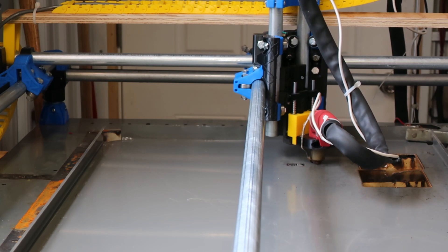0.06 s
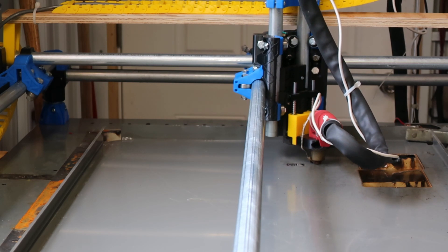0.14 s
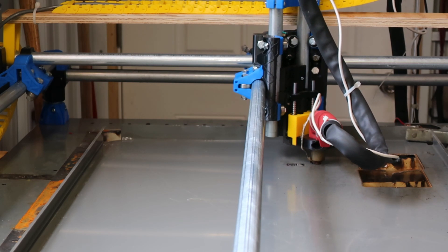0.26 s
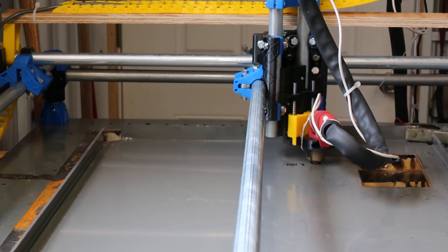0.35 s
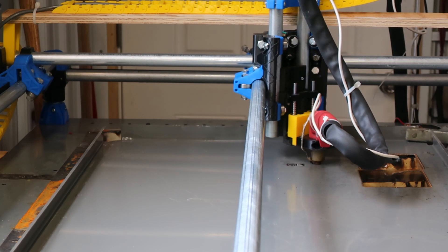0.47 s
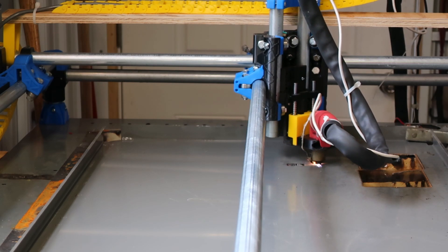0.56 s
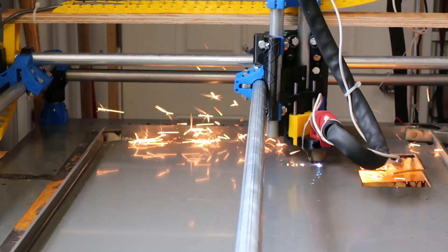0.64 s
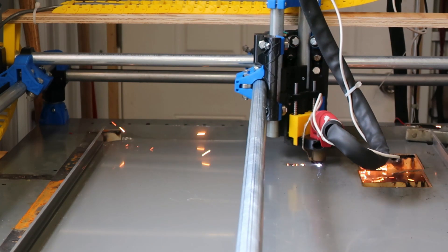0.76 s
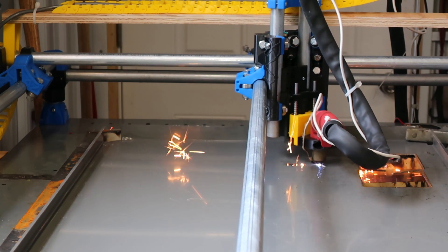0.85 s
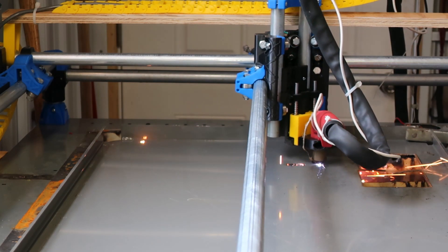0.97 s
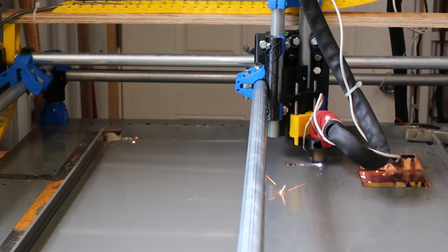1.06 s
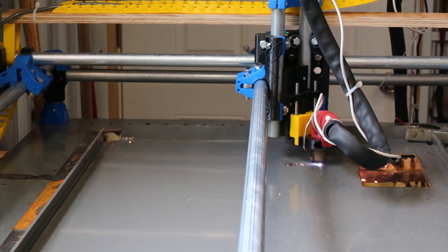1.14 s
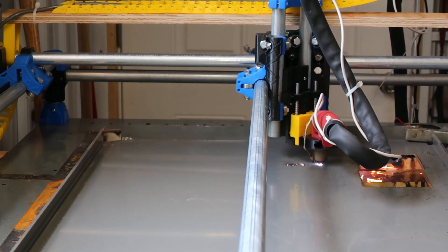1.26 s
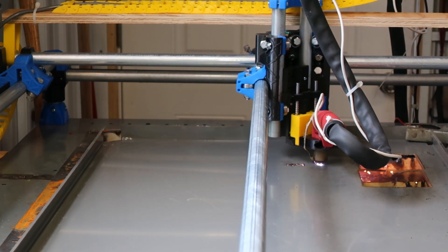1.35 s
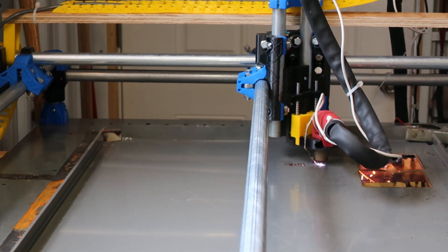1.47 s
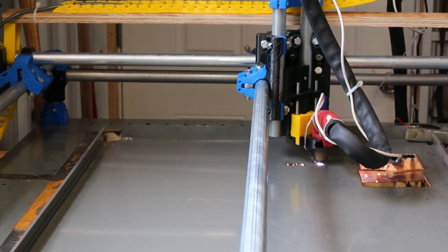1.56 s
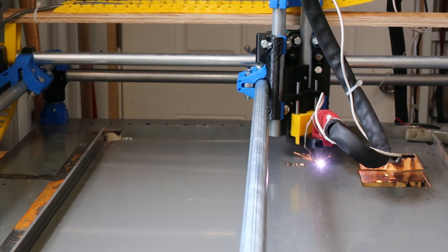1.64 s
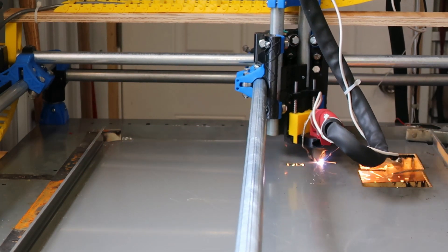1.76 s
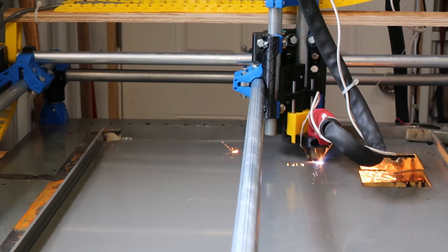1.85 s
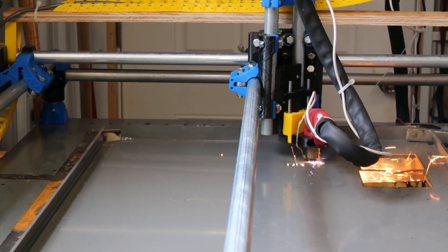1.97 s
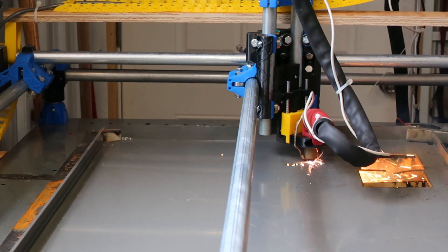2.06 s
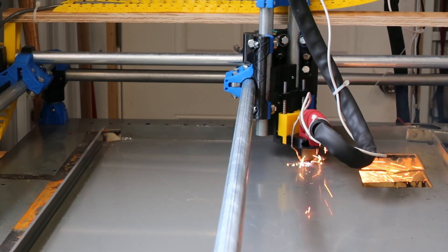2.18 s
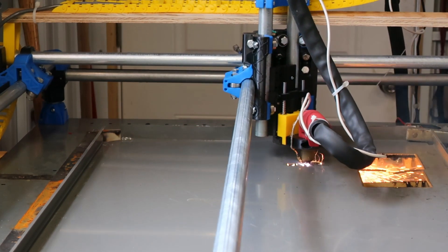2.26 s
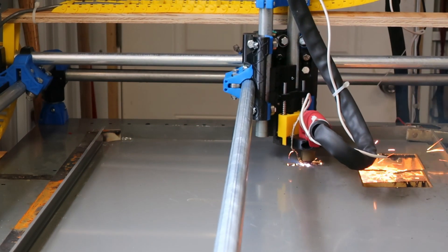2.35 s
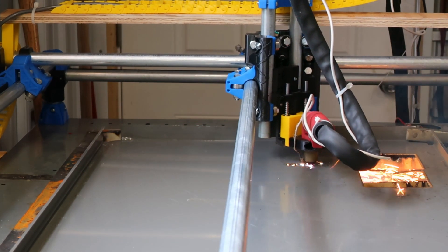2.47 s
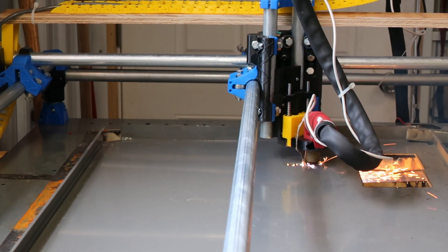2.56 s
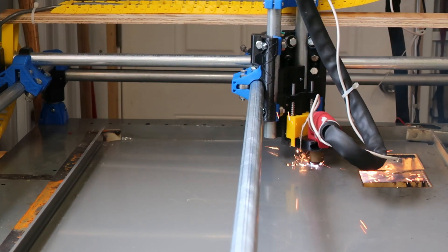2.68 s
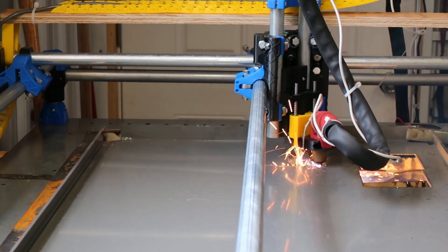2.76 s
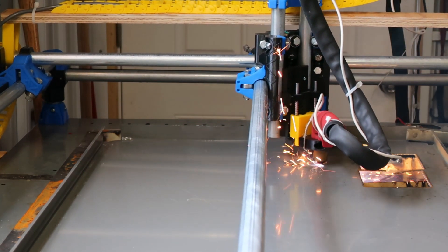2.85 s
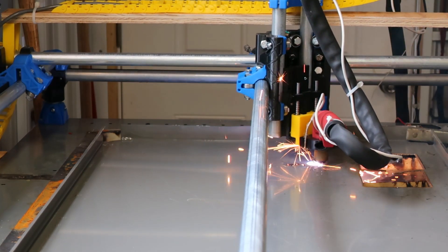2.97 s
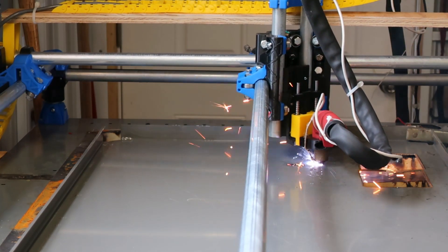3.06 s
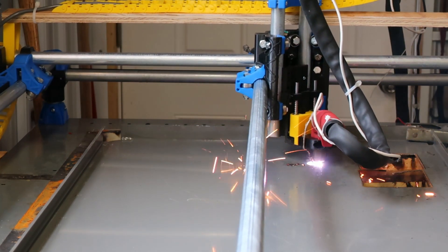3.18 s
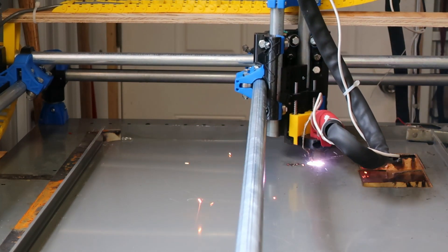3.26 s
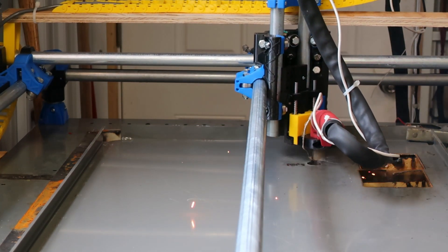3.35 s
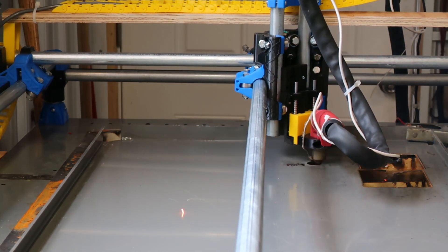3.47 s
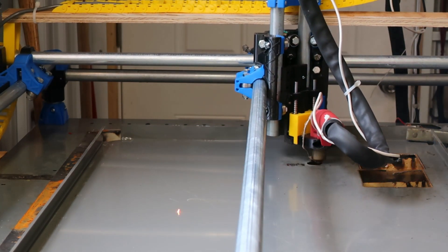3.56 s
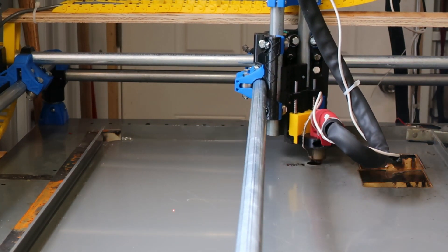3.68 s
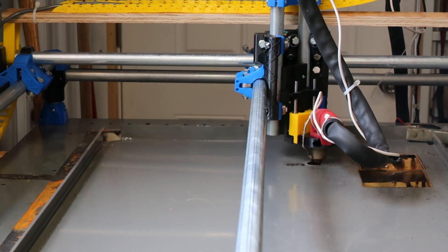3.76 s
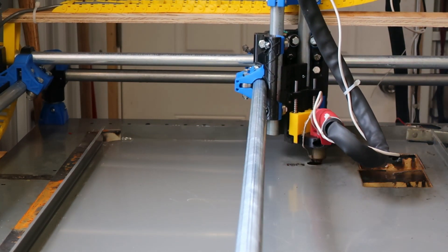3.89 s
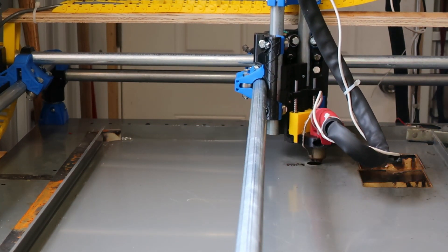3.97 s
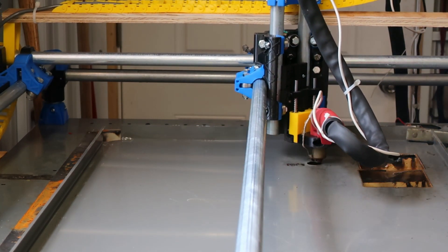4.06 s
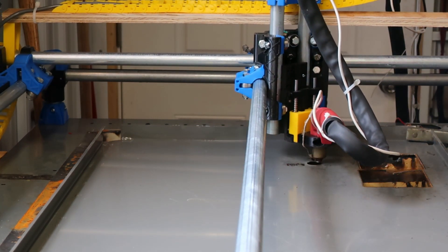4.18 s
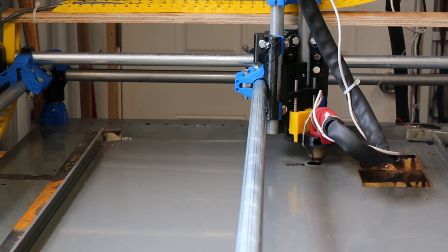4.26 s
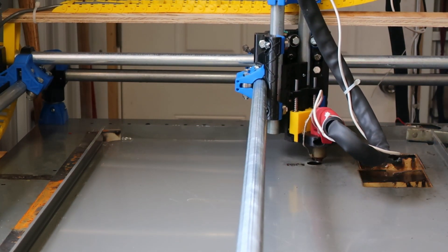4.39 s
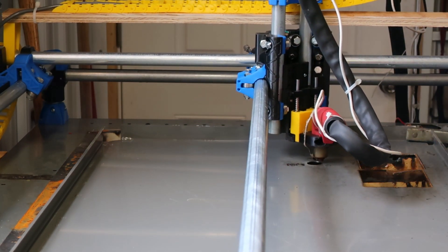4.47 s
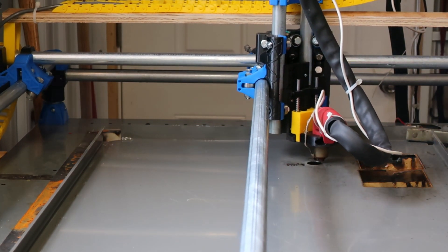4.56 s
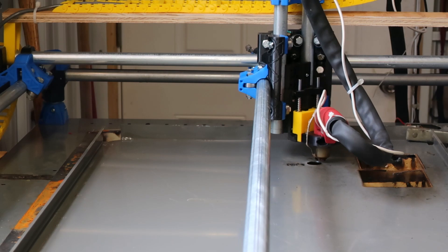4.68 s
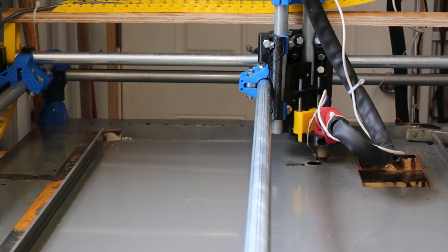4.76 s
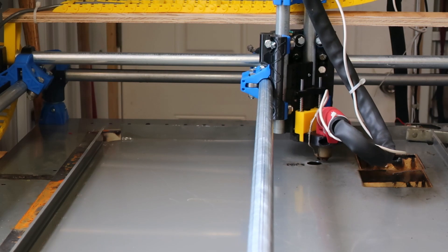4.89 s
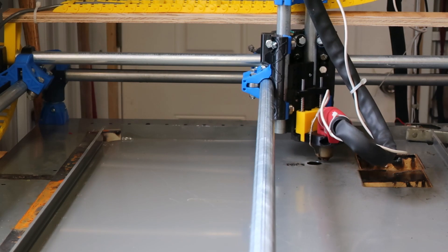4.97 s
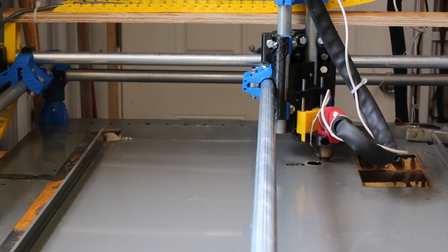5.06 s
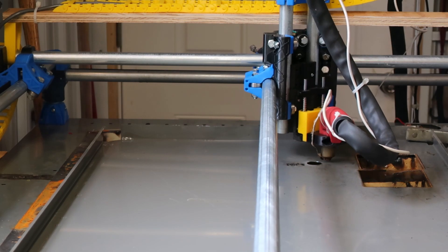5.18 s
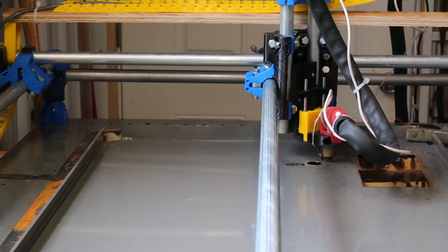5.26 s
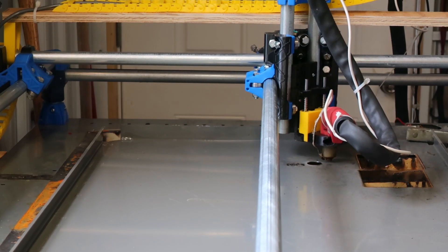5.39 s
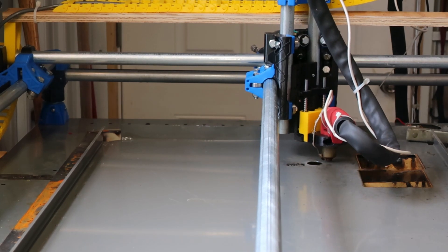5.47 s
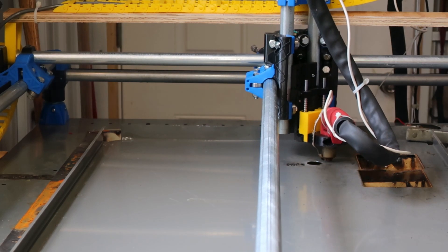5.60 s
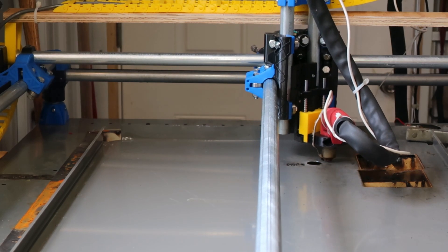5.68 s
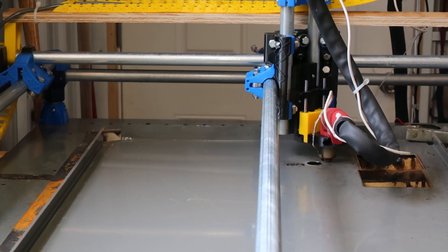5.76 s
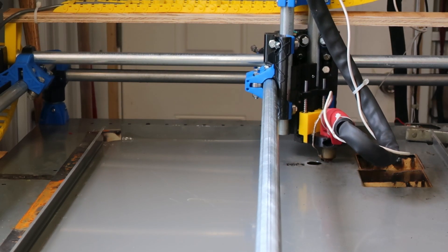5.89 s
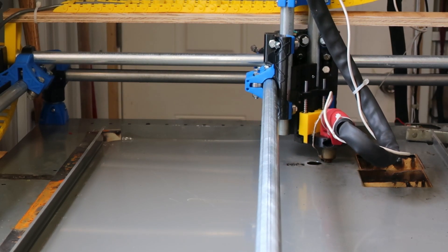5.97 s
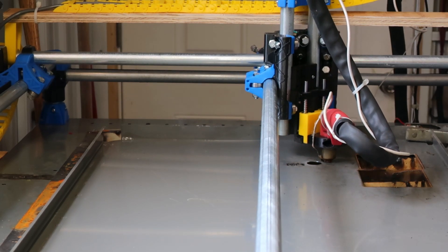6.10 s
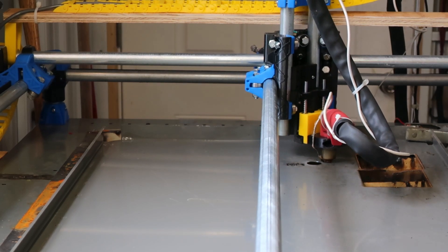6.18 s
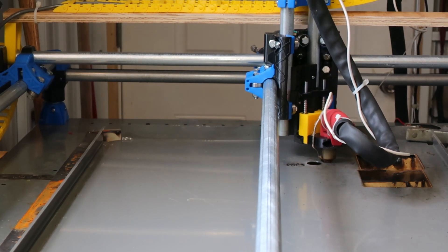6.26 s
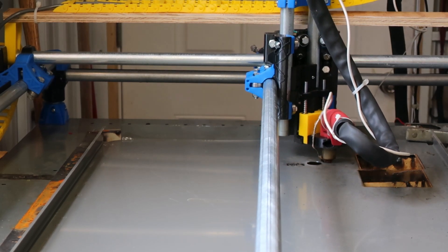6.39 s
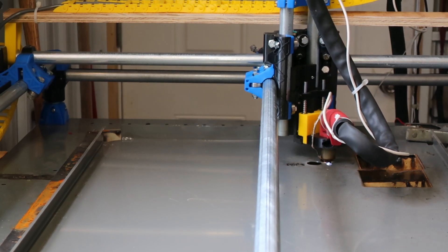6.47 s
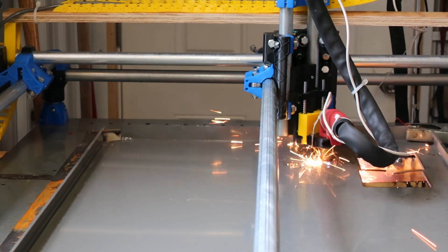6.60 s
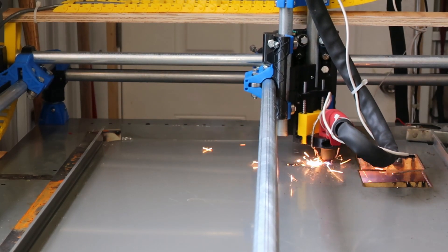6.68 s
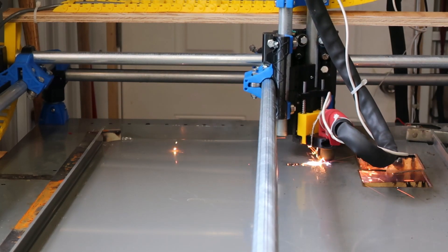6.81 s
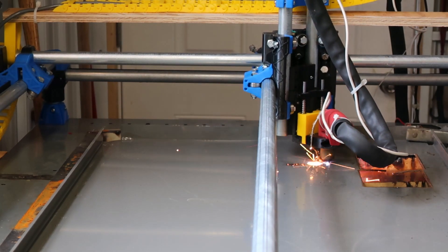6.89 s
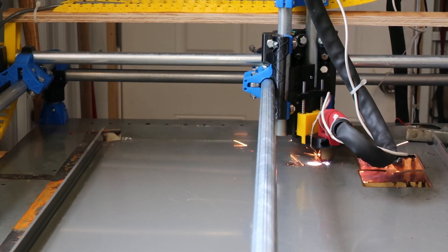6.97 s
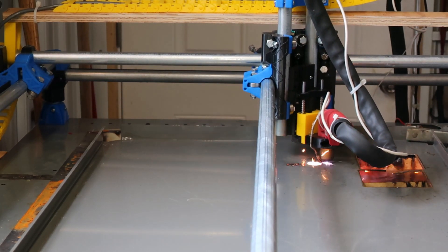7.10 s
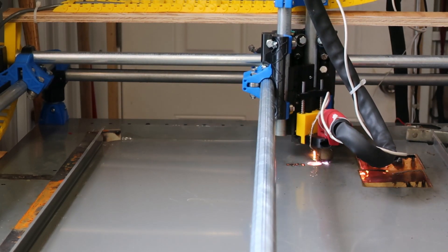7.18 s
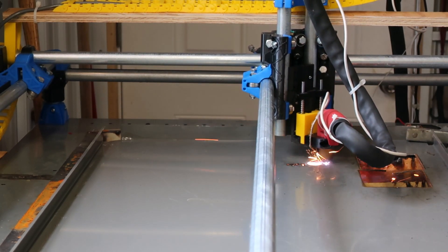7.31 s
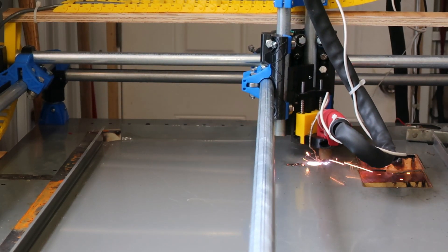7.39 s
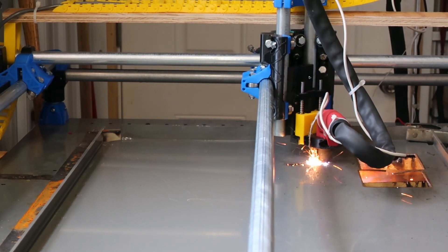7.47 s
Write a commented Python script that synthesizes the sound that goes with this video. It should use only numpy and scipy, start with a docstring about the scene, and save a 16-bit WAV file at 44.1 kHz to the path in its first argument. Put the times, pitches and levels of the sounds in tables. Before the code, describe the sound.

A torch over thin sheet steel in a small, moderately echoing workshop, close stereo microphone. From 0 to 0.65 s a smooth, bright cold air jet hisses with thin wavering whistles. At 0.65 s several sharp cracks and a brief rough mid-pitched note mark the strike; a momentary muffled lull opens into a harsh, unsteady roar ringing the sheet metal. Until 3.45 s it hisses and flutters with spitting sparks, dense gobby puffs and hollow thumps, mostly from 1 to 1.8 s, plus short howls, flares and stalls. The arc ends with a small pop, dropping to weak air that climbs back over about two seconds, breathy and whistling around 4.5 to 6 s, its roar then thinning to hiss. At 6.58 s louder cracks and another short honk start a second ragged, sputtering burn, continuing to the end at about 7.7 s. A cooling fan hums barely audibly throughout.

```python
"""A plasma torch roars and sputters through thin steel sheet on a cutting table in a small workshop.
Each of two cuts strikes with a few cracks and a brief rough note; the second still burns at the end.
Before and between the cuts a cold air jet hisses and whistles; it sags as the arc goes out, then swells.
The jets are shaped noise, the sparks pulses, the notes sines; sheet, table, nozzle and room colour them.
A microphone with two ports hears it all, with a cooling fan humming faintly behind."""
import sys
import numpy as np
from scipy import signal
from scipy.fft import rfft, irfft, next_fast_len
from scipy.io import wavfile
from scipy.ndimage import uniform_filter1d

SR = 44100
rng = np.random.default_rng(int(sys.argv[2]) if len(sys.argv) > 2 else 0)


def master(y):
    """Save y as 16-bit WAV."""
    cut = np.clip(np.atleast_2d(y).T, -1, 1)
    pcm = np.round(cut * 32767)  # scale
    wavfile.write(sys.argv[1], SR, pcm.astype(np.int16))


N = 332514

# All source levels below are ahead of the resonances, the room and the microphone.

# Echo of the small workshop against the direct sound. Each row: frequency in Hz, level in dB.
ROOM_ECHO = [(200, -2.5), (1000, -3.5), (2500, -4.5), (6000, -7.5), (14000, -31)]
# Sound from the sides, heard oppositely at the two ports. Each row: frequency in Hz, gain in dB.
PORT_WIDTH = [(60, -17), (200, -21.5), (1400, -31), (2300, -23.5), (3200, -12), (4400, -3.5), (6000, 0.5),
              (8000, 3), (10000, 6.5), (15000, 8.5)]
# Resonances of the sheet and the hollow table under it.
# Each row: centre in Hz, width in Hz, peak in dB.
TABLE_RESONANCES = [(245.7, 48, 5), (388, 42, 10), (683, 30, 10.5), (734, 26, 11), (866, 28, 7),
                    (912, 26, 7.5), (1032, 24, 8.5), (1056, 24, 5), (1115, 30, 2), (1238, 70, 5.5),
                    (1365, 50, 3), (1557, 42, 6.5), (1608, 30, 5.5), (1765, 55, 6.5), (1848, 32, 7),
                    (1890, 30, 6), (2130, 100, 4.5), (2235, 42, 7), (2350, 30, 1), (2485, 70, 4.5),
                    (2638, 40, 5), (2780, 130, 3), (2888, 42, 6.5), (3060, 70, 2), (3270, 50, 0),
                    (4220, 110, 2.5), (5230, 110, -2), (9800, 650, 0.5), (10700, 160, -4)]
# Resonances that the cold air rings above the sheet, around the nozzle and its holder.
# Each row: centre in Hz, width in Hz, peak in dB.
NOZZLE_RESONANCES = [(392, 80, 8.5), (860, 30, 3), (1050, 25, 1), (1240, 40, 1), (1355, 30, 5),
                     (1501, 24, 5.5), (1557, 30, 6.5), (1606, 26, 4), (1680, 36, 2), (1757, 36, 2),
                     (2086, 40, 3.5), (2178, 44, 1), (2250, 40, 2), (2475, 50, 4), (2636, 30, 3),
                     (2783, 26, 2.5), (2915, 45, 3), (2995, 40, 1), (3119, 44, 6), (3185, 36, 2),
                     (3475, 36, 2), (3635, 44, 4), (3780, 40, 0), (4090, 44, 1.5), (4200, 50, 1.5),
                     (5430, 80, 3), (6080, 70, -1), (7060, 120, 0), (7450, 100, 2), (7800, 200, -2),
                     (8250, 160, -3), (8800, 260, -3), (9200, 150, -3), (10860, 110, 4), (11700, 270, -2),
                     (12300, 140, 3), (13700, 160, 2)]

# Torch timing. Each row: arc on in seconds, arc off in seconds.
BURNS = [(0.649, 3.452), (6.583, 7.7)]

# Air jet while the torch lifts, travels and comes down, the same before every strike.
# Each row: time before the strike in seconds, roar level in dB, roar centre in Hz.
TORCH_APPROACH = [(3.14, -31, 2200), (2.35, -26, 2450), (1.87, -23, 2180), (1.63, -27.5, 2740),
                  (0.82, -33, 3130), (0.65, -33.5, 3740), (0.15, -49.5, 1700), (0.02, -44.5, 1800)]
# Low rush of the cold air off the sheet. Each row: frequency in Hz, density in dB per Hz.
AIR_RUSH_SPECTRUM = [(25, -46), (55, -50), (110, -11), (180, -4), (260, 1), (390, -0.5), (550, 2.5),
                     (800, 4), (1300, -3), (2500, 1.5), (5000, -26)]
# Hiss of the cold air. Each row: frequency in Hz, density in dB per Hz.
AIR_HISS_SPECTRUM = [(1000, -23), (2500, 3.5), (4000, 6), (6000, 6), (8000, 6), (9700, 5.5), (11500, 7),
                     (13200, 5.5), (14000, 1.5), (15500, -1)]
# Whistles of the cold air.
# Each row: middle before the strike in seconds, length in seconds, level in dB, pitch in Hz, width in Hz.
AIR_WHISTLES = [(2.13, 2.2, -48, 3478, 37), (1.8, 1, -38.5, 2110, 280), (0.85, 1.7, -39.5, 3010, 220),
                (0.66, 1.1, -46, 5520, 170), (0.5, 2.0, -53, 9400, 200), (0.2, 0.9, -45, 14000, 200)]

# Sparks, most of them as the arc strikes. Each row: time in seconds, level in dB.
SPARK_CRACKS = [(0.6478, 5), (0.6515, -1), (0.6564, 2), (0.6603, -10), (0.6682, -2), (1.0644, -13),
                (1.574, -13), (6.5796, 5), (6.5888, 0), (6.593, -1), (6.5968, -8), (6.6055, -3),
                (6.617, -2), (6.722, -8), (6.7284, -8)]
# Note after each strike. Each row: start in seconds, level in dB, pitch in Hz.
STRIKE_NOTES = [(0.656, -29.5, 776), (6.6, -27.5, 866)]
# Puffs of the burning jet: mostly melt gobs, with a chirp at each strike and a pop as the arc stops.
# Each row: middle in seconds, level in dB, centre in Hz.
JET_PUFFS = [(0.6746, -28, 3220), (0.925, -34, 731), (0.994, -25.5, 825), (0.985, -27.5, 1214),
             (1.02, -34, 996), (1.064, -26.5, 1067), (1.088, -33, 1162), (1.109, -31, 1087),
             (1.145, -40, 657), (1.25, -35, 643), (1.28, -31.5, 848), (1.33, -32, 1010), (1.389, -37, 1156),
             (1.42, -29, 1253), (1.45, -33, 1060), (1.478, -33.5, 1002), (1.518, -41, 757),
             (1.574, -37, 1100), (1.602, -35, 1325), (1.628, -37, 1060), (1.658, -30.5, 946),
             (1.76, -34.5, 733), (3.255, -34, 1140), (3.338, -30, 1196), (3.434, -32.5, 1045),
             (6.617, -27, 4190), (6.846, -32, 1048), (6.905, -42, 641), (6.922, -35, 1290),
             (7.157, -29.5, 1190), (7.173, -36.5, 900), (7.199, -31.5, 1275), (7.403, -27.5, 1075),
             (7.42, -27, 1810), (7.471, -28.5, 1180)]
# Low thumps in the hollow under the sheet, some as the arc strikes.
# Each row: middle in seconds, length in seconds, level in dB, centre in Hz.
HOLLOW_THUMPS = [(0.665, 0.085, -47.5, 300), (0.995, 0.05, -34, 476), (1.164, 0.04, -43, 400),
                 (1.278, 0.041, -40, 425), (1.485, 0.061, -38, 416), (1.605, 0.062, -35.5, 410),
                 (1.657, 0.03, -42, 410), (1.754, 0.07, -38, 436), (1.815, 0.04, -47, 440),
                 (3.437, 0.025, -35.5, 524), (6.616, 0.1, -46.5, 258)]
# Brief howls of the hot jet on the edge of the kerf.
# Each row: middle in seconds, length in seconds, level in dB, centre in Hz.
KERF_HOWLS = [(0.73, 0.13, -41, 3500), (0.815, 0.082, -29.5, 2380), (1.135, 0.028, -33, 2500),
              (1.462, 0.06, -35, 2600), (2.06, 0.12, -33.5, 2240), (2.122, 0.038, -36, 2850),
              (2.52, 0.024, -32, 1700), (2.636, 0.03, -30, 1600), (2.86, 0.06, -32, 3700),
              (3.01, 0.076, -31, 3400), (3.075, 0.1, -35, 3460), (3.14, 0.14, -35.5, 2150),
              (3.295, 0.04, -35, 3970), (3.385, 0.046, -34, 2150), (6.591, 0.023, -32, 2450),
              (6.652, 0.035, -35, 2180), (6.735, 0.044, -31, 2100), (6.74, 0.08, -37, 3900),
              (6.765, 0.053, -31, 1570), (6.81, 0.05, -32, 3500), (6.97, 0.04, -31, 2880),
              (7.0, 0.13, -32, 1700), (7.1, 0.066, -34, 1470), (7.36, 0.072, -32.5, 1830)]

# Slow course of each cut, ahead of flares and brief changes. Each row: time in seconds, roar level in dB,
# roar centre in Hz, blow-through level under the sheet in dB, nozzle hiss level in dB.
CUT_COURSE = [(0.66, -36, 3030, -39.5, -30.5), (0.9, -33, 2560, -36.5, -33.5),
              (1.03, -34.5, 1900, -44, -35), (1.2, -35.5, 2400, -39.5, -35), (1.65, -34.5, 2330, -39, -38),
              (1.85, -35, 2770, -42.5, -39.5), (2.3, -36, 2430, -41, -36), (2.55, -33, 2200, -43, -31.5),
              (3.08, -33.5, 2600, -41, -33.5), (3.27, -34, 1910, -39.5, -33), (3.44, -37, 1860, -43.5, -37),
              (6.6, -37, 2800, -35.5, -27.5), (6.68, -34, 2740, -44.5, -34.5),
              (6.89, -36, 2100, -37.5, -32), (7.02, -32, 2030, -53, -35), (7.14, -35, 2020, -43, -32.5),
              (7.24, -30.5, 2270, -42.5, -35.5), (7.54, -35, 1760, -43.5, -37.5)]
# The jet breaks free through the sheet and its roar flares.
# Each row: middle in seconds, length in seconds, lift in dB, shift of the centre in octaves.
ROAR_FLARES = [(0.804, 0.21, 2.5, -0.074), (1.11, 0.075, 2, 0.12), (1.29, 0.04, 6, -0.02),
               (1.384, 0.07, 5, -0.015), (1.453, 0.11, 5.5, -0.1), (1.59, 0.14, 4, -0.038),
               (2.084, 0.48, 3.5, 0), (2.24, 0.098, 2.5, -0.071), (2.46, 0.063, 1, 0.05),
               (2.535, 0.051, 3, 0.03), (2.596, 0.13, 1.5, -0.059), (3.006, 0.071, 1, 0.13),
               (3.092, 0.2, 5, 0.083), (3.39, 0.081, 2, 0), (6.752, 0.11, 4, -0.19), (6.808, 0.056, 7, 0),
               (6.966, 0.13, 4, -0.064), (7.29, 0.043, 1.5, -0.072), (7.342, 0.085, 3, 0.23),
               (7.417, 0.056, 3, -0.033)]
# Brief changes of the jet's level, mostly drops as it stalls.
# Each row: middle in seconds, length in seconds, level change in dB.
JET_CHANGES = [(1.024, 0.1, -10), (1.168, 0.055, -2), (1.247, 0.057, -0.5), (1.525, 0.06, -0.5),
               (1.69, 0.05, -1.5), (1.944, 0.065, -2), (3.28, 0.048, -4.5), (3.35, 0.044, -1),
               (7.047, 0.05, 0), (7.236, 0.052, -5), (7.507, 0.036, 2.5)]
# Blow-through under the sheet. Each row: frequency in Hz, density in dB per Hz.
BLOW_SPECTRUM = [(25, -44), (55, -61), (110, -26), (180, -15.5), (260, -10), (390, 0), (550, -1.5),
                 (750, -3), (1100, 2), (2000, -3.5), (5000, -46)]
# Hiss of the burning arc jet. Each row: frequency in Hz, density in dB per Hz.
ARC_HISS_SPECTRUM = [(1000, -22.5), (3000, 10), (3800, 9), (4700, 6.5), (6000, 5.5), (8500, 3.5),
                     (10800, 4.5), (13000, 4), (14300, -1.5), (15500, -22)]

ROOM_T60_S, GANTRY_DB = 0.51, -12
AIR_HISS_DB, AIR_RUSH_DB = -31, -48
AIR_SAG_DB, AIR_RISE_DB_PER_S = -21, 10
RUSH_ROAR_SHARE, RUSH_FLOW_SHARE = 0.19, 0.96  # how far the low rush follows the roar, and the flow
CREST_DB = -12.5  # the jet's favourite eddy size, against its broad hump
PIERCE_DB, PIERCE_LAG_S, PIERCE_S = -6, 0.043, 0.16
NOTE_ATTACK_S, NOTE_T60_S = 0.004, 0.14
PUFF_CYCLES = 34  # length of a puff: low ones last longer
SMALL_GOBS_PER_S, SMALL_GOB_DB, SMALL_GOB_HZ = 6, -53.5, 999
CHANGE_OCTAVES_PER_DB = 0.05  # a weaker jet also gets duller
FLARE_HISS_SHARE, CHANGE_HISS_SHARE = 0.35, 0.41  # flares and brief changes also move the hiss

FRAME = 256  # samples
HOP = FRAME // 4
TIME = np.arange(N) / SR
FRAME_S = np.arange(N // HOP + 2) * HOP / SR
BIN_HZ = np.maximum(np.fft.rfftfreq(FRAME, 1 / SR), 20)[:, None]
SIZE = next_fast_len(N + SR, True)
FREQ = np.maximum(np.fft.rfftfreq(SIZE, 1 / SR), 1)


def undb(db):
    """Decibels to gain."""
    return 10 ** (np.asarray(db) / 20)


def colour(points):
    """Gain at every frequency from (Hz, dB) points."""
    hz, db = np.transpose(points)
    return undb(np.interp(np.log(FREQ), np.log(hz), db))


def resonances(modes):
    """Gain of resonance peaks that stand on a flat response."""
    power = 1
    for hz, width, db in modes:
        power = power + undb(db) ** 2 / (1 + (2 * (FREQ - hz) / width) ** 2) ** 2
    return np.sqrt(power)


def filtered(x, gain):
    """Apply a frequency response."""
    return irfft(rfft(x, SIZE) * gain, SIZE)[..., :N]


def causal(gain):
    """The minimum-phase response with this gain: it rings only after it is struck."""
    cepstrum = irfft(np.log(gain), SIZE)
    cepstrum[1:SIZE // 2] *= 2
    cepstrum[SIZE // 2 + 1:] = 0
    return np.exp(rfft(cepstrum))


def bandpass(x, low_hz, high_hz):
    """Keep the band between two frequencies."""
    return signal.sosfilt(signal.butter(2, [low_hz, high_hz], "band", fs=SR, output="sos"), x)


def noise(gain):
    """Coloured noise of rms 1."""
    x = filtered(rng.standard_normal(N), gain)
    return x / x.std()


def walk(rate_hz):
    """Smooth random wandering of spread 1 that changes about rate_hz times a second."""
    return noise(np.exp(-(FREQ / rate_hz) ** 2))


def controls(table):
    """Each column of a curve table at every sample."""
    s, *columns = np.transpose(table)
    return [np.interp(TIME, s, column) for column in columns]


def swell(middle_s, length_s):
    """A smooth rise and fall, 0-1."""
    out = np.zeros(N)
    span = np.abs(TIME - middle_s) < length_s / 2
    out[span] = np.cos(np.pi * (TIME[span] - middle_s) / length_s) ** 2
    return out


def puff(middle_s, length_s, db, hz, sharpness):
    """A short swell of turbulence around one pitch."""
    shape = swell(middle_s, length_s)
    span = np.abs(TIME - middle_s) < length_s / 2
    spread = 1 + .5 / sharpness
    band = bandpass(rng.standard_normal(SR // 2), hz / spread, hz * spread)
    out = np.zeros(N)
    if span.any():
        burst = band[-span.sum():] * shape[span]  # the settled end of the filtered noise
        out[span] = burst * undb(db) * np.linalg.norm(shape[span]) / (np.linalg.norm(burst) + 1e-18)
    return out


def jet(centre_hz, rise, fall, flicker_db, low_hz):
    """Turbulent mixing noise of rms 1: a hump that follows the eddy rate; eddies of each size flicker."""
    ratio = BIN_HZ / np.interp(FRAME_S, TIME, centre_hz)
    hump = ratio ** rise / np.sqrt(1 + ratio ** (2 * (rise + fall)))
    hump_rms = np.sqrt(np.mean(hump ** 2, axis=0))
    eddies = rng.standard_normal(hump.shape)
    eddies = uniform_filter1d(eddies, size=5, axis=0)  # alike in neighbouring bands
    eddies = uniform_filter1d(eddies, size=12, axis=1)  # and in neighbouring frames
    gain = hump / hump_rms * undb(flicker_db * eddies / eddies.std())
    white = signal.stft(rng.standard_normal(N + FRAME), nperseg=FRAME, noverlap=FRAME - HOP)[2]
    x = signal.istft(white[:, :len(FRAME_S)] * gain, nperseg=FRAME, noverlap=FRAME - HOP)[1][:N]
    x = filtered(x, 1 / np.sqrt(1 + (low_hz / FREQ) ** 6))  # a thin jet radiates no bass
    return x / x.std()


def echoes(t60_s, delay_s):
    """Response of dense reflections that die away, with unit energy."""
    decay = undb(-60 * np.minimum(TIME / t60_s, 4))
    tail = rng.standard_normal(N) * decay * (TIME > delay_s)
    return rfft(tail / np.linalg.norm(tail), SIZE)


def reflections(x, t60_s, delay_s, count=4):
    """Echoes of a restless jet: shifting spots, each with its own paths to the microphone."""
    shares = np.array([walk(5) for _ in range(count)])
    shares /= np.linalg.norm(shares, axis=0)
    return sum(filtered(x * share, echoes(t60_s, delay_s)) for share in shares)


def workshop(x):
    """Direct sound, quick treble reflections off the gantry, and the room, at the two ports."""
    gantry = undb(GANTRY_DB) / np.sqrt(1 + (3800 / FREQ) ** 6)
    room = colour(ROOM_ECHO)
    direct = filtered(x, (1 + gantry * echoes(0.05, 0.0002)) / np.hypot(1, room))
    mid = direct + filtered(reflections(x, ROOM_T60_S, .005), room / np.hypot(1, room))
    # only sound that arrives from the sides tells the two ports apart, mostly in the treble
    near_side = 0.69 * reflections(x, 0.025, 0.00055)
    room_side = 0.5 * reflections(x, ROOM_T60_S, 0.0062, count=2)
    side = filtered(near_side + room_side, colour(PORT_WIDTH))
    return np.array([mid + side, mid - side])


def fan(hz=398, db=-72):
    """The power unit's cooling fan: a faint sine hum whose pitch wavers."""
    pitch_hz = hz * (1 + 0.0035 * walk(5.6))
    return undb(db) * np.sqrt(2) * np.sin(2 * np.pi * np.cumsum(pitch_hz) / SR)


def airflow_db():
    """Strength of the air against full flow: weak as the arc goes out, then climbing back steadily."""
    flow_db = 0
    for on, off in BURNS:
        climb_db = AIR_SAG_DB + AIR_RISE_DB_PER_S * np.maximum(TIME - off, 0)
        flow_db = flow_db + (TIME > (on + off) / 2) * np.minimum(climb_db, 0)
    return flow_db


def approach():
    """Roar level and centre of the air jet, from the time left until the next strike."""
    return controls([(on - before, db, hz) for on, off in BURNS for before, db, hz in TORCH_APPROACH])


def air():
    """The cold jet is smoother and brighter; it follows the flow, and its roar fades near the sheet."""
    flow_db = airflow_db()
    roar_db, centre_hz = approach()
    rush_db = RUSH_FLOW_SHARE * flow_db + RUSH_ROAR_SHARE * (roar_db - roar_db.min())
    hump = jet(centre_hz, rise=1.15, fall=1.66, flicker_db=1.9, low_hz=388)
    crest = jet(centre_hz, rise=3.1, fall=9.4, flicker_db=5.5, low_hz=370)
    crested = (hump + undb(CREST_DB) * crest) / np.hypot(1, undb(CREST_DB))
    roar = crested * undb(roar_db + flow_db + 0.58 * walk(29.0))
    rush = noise(colour(AIR_RUSH_SPECTRUM)) * undb(AIR_RUSH_DB + rush_db + 0.9 * walk(12))
    hiss = noise(colour(AIR_HISS_SPECTRUM)) * undb(AIR_HISS_DB + flow_db + 0.96 * walk(22))
    return roar + rush + hiss


def sheet_bounce(notch_hz=1415, width_hz=60, depth_db=-4.0):
    """Gain of the air's sound as its bounce off the sheet weakens one narrow band."""
    return undb(depth_db / (1 + ((FREQ - notch_hz) / width_hz) ** 2))


def whistles(drift=0.008, flutter_db=2.5):
    """The cold jet whistles on nozzle and cut edge: wavering notes over parts of the torch's travel."""
    clock = np.cumsum(1 + drift * walk(8.98)) / SR
    out = 0
    for before, length, db, hz, width in AIR_WHISTLES:
        grain = noise(1 / (1 + (2 * FREQ / width) ** 2))
        note = grain * np.sqrt(2) * np.sin(2 * np.pi * hz * clock)
        out = out + note * undb(db) * sum(swell(on - before, length) for on, off in BURNS)
    return out * undb(flutter_db * walk(12))


def honk(waver=0.0122, rough_db=-2.0):
    """After each strike the jet, trapped against the unpierced sheet, rings one brief rough note."""
    pitch = 1 + waver * walk(93)
    grain = undb(rough_db * walk(150))
    out = 0
    for s, db, hz in STRIKE_NOTES:
        age = np.maximum(TIME - s, 0)
        decay = undb(db - 60 * np.minimum(age / NOTE_T60_S, 2))
        envelope = np.minimum(age / NOTE_ATTACK_S, 1) * decay
        out = out + envelope * np.sqrt(2) * np.sin(2 * np.pi * np.cumsum(hz * pitch) / SR)
    return out * grain


def sparks(lit, spit_rate=45, spit_db=-25.5, low_hz=1000, high_hz=7000, fizz_db=-7, fizz_t60_s=0.01):
    """Sharp pressure pulses with a short fizz: big ones mostly at strikes, small ones while it burns."""
    spit_level_db = spit_db + 1.7 * np.clip(rng.standard_normal(N), -2, 2)
    pulses = (rng.random(N) < lit * spit_rate / SR) * undb(spit_level_db)
    for s, db in SPARK_CRACKS:
        pulses[int(s * SR)] += undb(db)
    fizz = undb(fizz_db) * echoes(fizz_t60_s, 0)
    pulses = filtered(pulses, (1 + fizz) / np.hypot(1, undb(fizz_db)))
    return bandpass(pulses, low_hz, high_hz)


def small_gobs(scatter_db=14.0, scatter_octaves=0.343, count=120):
    """Lesser gobs at random while the arc burns, as rows of (s, level dB, centre Hz)."""
    chance = rng.random((count, 3))
    times = np.cumsum(-np.log(1 - chance[:, 0]) / SMALL_GOBS_PER_S)
    rows = []
    for s, (a, b) in zip(times, 2 * chance[:, 1:] - 1):
        if any(on < s < off for on, off in BURNS):
            rows.append((s, SMALL_GOB_DB + scatter_db * a, SMALL_GOB_HZ * 2 ** (scatter_octaves * b)))
    return rows


def sputters(puff_sharpness=2.5, thump_sharpness=2.2):
    """Short puffs of the burning jet, mostly melt gobs, and low thumps in the hollow under the sheet."""
    rows = JET_PUFFS + small_gobs()
    puffs = sum(puff(s, PUFF_CYCLES / hz, db, hz, puff_sharpness) for s, db, hz in rows)
    return puffs + sum(puff(*row, thump_sharpness) for row in HOLLOW_THUMPS)


def howls(sharpness=4.3):
    """Now and then the jet locks onto the edge of the kerf and howls briefly around one pitch."""
    return sum(puff(*row, sharpness) for row in KERF_HOWLS)


def burning(strike_s=0.0049, quench_s=0.019):
    """Share of the arc, 0-1: it strikes almost at once and dies a little more slowly."""
    lit = 0
    for on, off in BURNS:
        struck = np.clip((TIME - on) / strike_s, 0, 1)
        lit = lit + struck * np.clip((off - TIME) / quench_s + .5, 0, 1)
    return lit


def piercing_db():
    """Every cut starts with a lull: the jet is muffled until it has melted through."""
    return sum(PIERCE_DB * swell(on + PIERCE_LAG_S, PIERCE_S) for on, off in BURNS)


def arc():
    """The hot jet in the kerf: roar and hiss follow flares and stalls; blow-through follows stalls only."""
    roar_db, centre_hz, blow_db, hiss_db = controls(CUT_COURSE)
    change_db = sum(db * swell(s, length) for s, length, db in JET_CHANGES)
    flare_db = sum(db * swell(s, length) for s, length, db, octaves in ROAR_FLARES)
    opening_db = flare_db + piercing_db()
    shift = sum(octaves * swell(s, length) for s, length, db, octaves in ROAR_FLARES)
    shift = shift + CHANGE_OCTAVES_PER_DB * change_db
    centre_hz = centre_hz * 2 ** shift * np.exp(0.07 * walk(32))
    shake = walk(93)  # shared by roar and blow-through
    roar = jet(centre_hz, rise=1.09, fall=2.75, flicker_db=2.5, low_hz=290)
    roar = roar * undb(roar_db + opening_db + change_db + 0.57 * shake)
    blow = noise(colour(BLOW_SPECTRUM)) * undb(blow_db + change_db + 0.83 * shake + 0.92 * walk(35))
    hiss_db = hiss_db + FLARE_HISS_SHARE * opening_db + CHANGE_HISS_SHARE * change_db
    hiss = noise(colour(ARC_HISS_SPECTRUM)) * undb(hiss_db + 1.07 * walk(25))
    return roar + blow + hiss


def scene():
    """Arc and air take turns at the nozzle: the arc rings the table, the air rings the torch."""
    lit = np.clip(burning(), 0, 1)
    cold = np.sqrt(1 - lit ** 2)
    torch = causal(resonances(NOZZLE_RESONANCES) * sheet_bounce())
    blowing = filtered(cold * air(), torch) + cold * whistles()
    table = causal(resonances(TABLE_RESONANCES))
    cutting = filtered(lit * arc() + sparks(lit) + sputters() + howls(), table)
    return workshop(cutting + blowing + honk() + fan())


def record(dry, ceiling=0.3, bass_hz=75, top_hz=15600):
    """The microphone rounds the sharpest cracks and drops the deepest bass; the recorder cuts the top."""
    rounded = dry / (1 + (dry / ceiling) ** 4) ** (1 / 4)
    thin = signal.sosfilt(signal.butter(2, bass_hz, "high", fs=SR, output="sos"), rounded)
    return signal.sosfilt(signal.ellip(10, .2, 80, top_hz, fs=SR, output="sos"), thin)


dry = scene()
out = record(dry)
master(out)
```